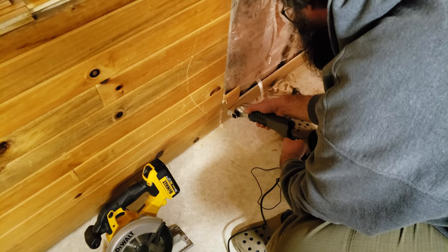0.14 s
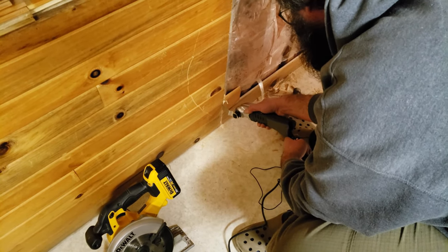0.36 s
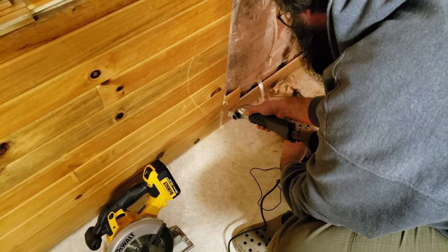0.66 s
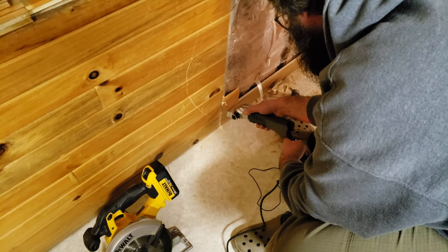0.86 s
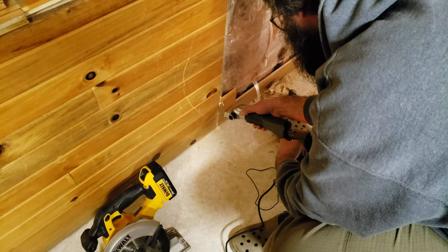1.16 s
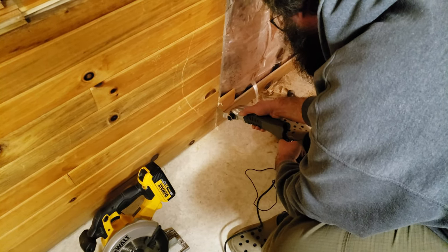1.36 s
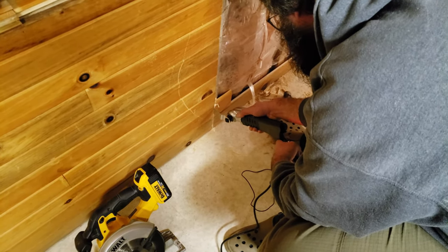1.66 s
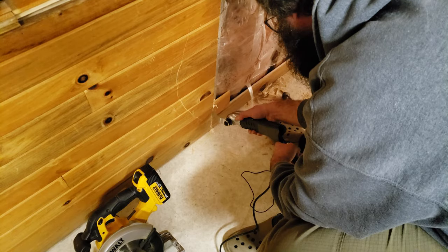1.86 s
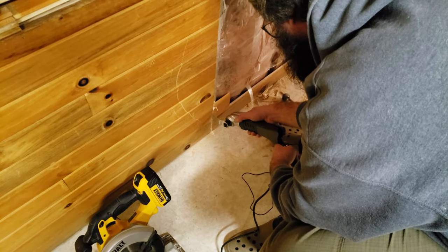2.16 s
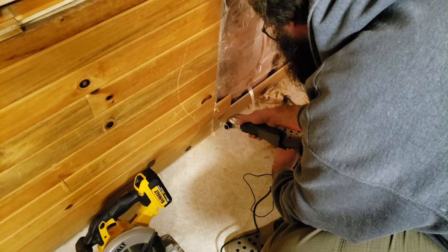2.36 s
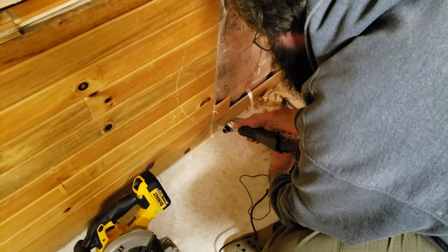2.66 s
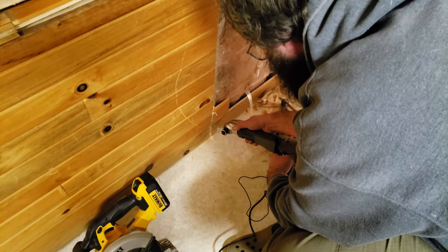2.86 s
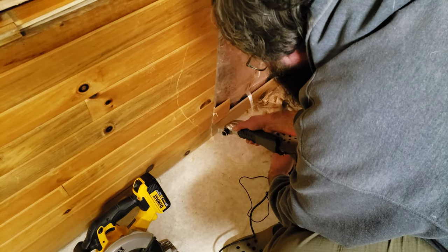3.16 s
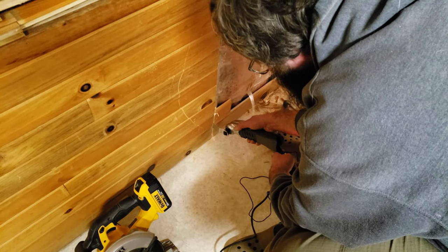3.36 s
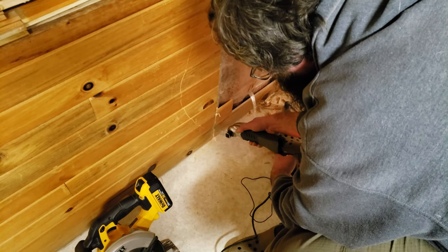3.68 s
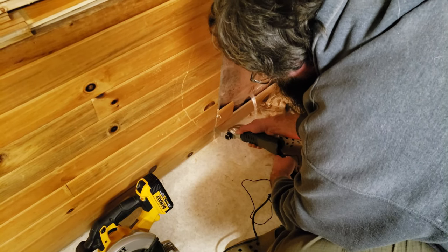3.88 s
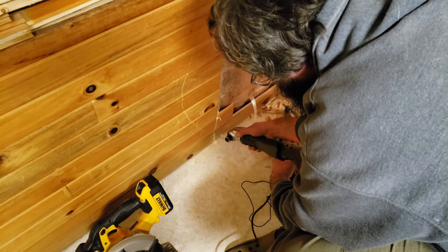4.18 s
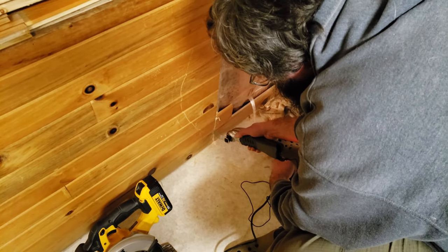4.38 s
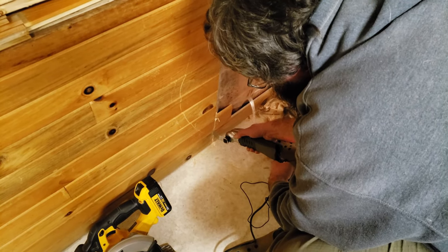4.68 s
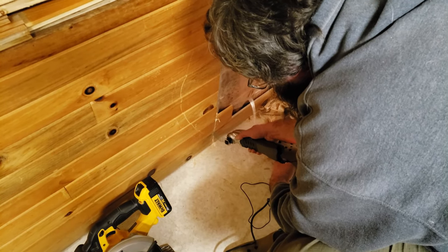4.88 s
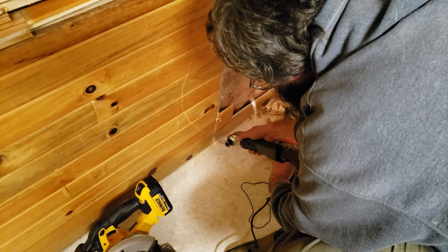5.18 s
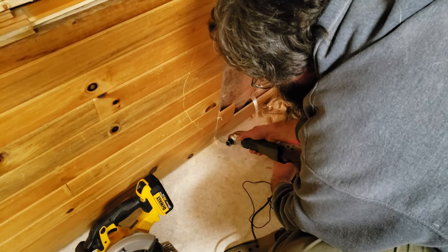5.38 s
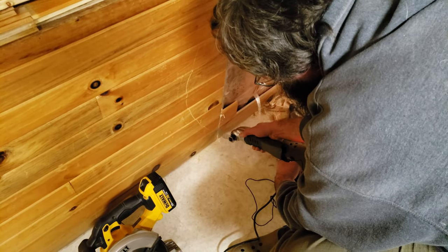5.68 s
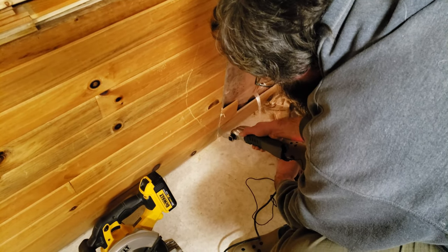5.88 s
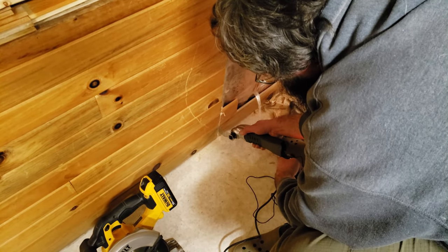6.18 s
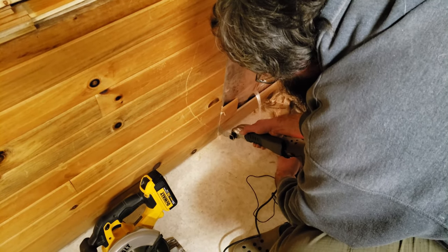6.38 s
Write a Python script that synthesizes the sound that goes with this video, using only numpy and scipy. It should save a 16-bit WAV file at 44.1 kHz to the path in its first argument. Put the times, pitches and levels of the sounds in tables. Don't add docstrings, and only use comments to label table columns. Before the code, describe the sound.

An oscillating power saw coasts to a knocking stop, restarts, then drones, buzzes and rasps through a hollow wooden wall, sagging under pressure, close indoors.

```python
import sys
import numpy as np
from scipy import signal
from scipy.fft import rfft, irfft, next_fast_len
from scipy.io import wavfile
from scipy.ndimage import uniform_filter1d, map_coordinates

SR = 44100
rng = np.random.default_rng(int(sys.argv[2]) if len(sys.argv) > 2 else 0)


def store_pcm(level_fs):
    pcm = np.round(np.clip(level_fs, -1, 1) * 32767).astype(np.int16)
    wavfile.write(sys.argv[1], SR, np.atleast_2d(pcm).T)


def boost(x):
    u = np.asarray(x, float) / 20
    return 10 ** u


N = 288414
T = np.arange(N) / SR
HZ = np.fft.rfftfreq(next_fast_len(N), 1 / SR)
TOP_HZ = 287.2

# (frequency [Hz], level [dB])
TEETH = [(8500, -17.5), (10000, -6.5), (11500, 0), (13000, 9), (14500, 7.5), (15900, 5.5), (17000, -29)]
# (frequency [Hz], left minus right [dB])
LEAN = [(60, 2), (150, -1), (380, -2), (950, 11), (2380, 10), (5980, 26.5), (15000, 23)]
# (pulled [s], released [s], coasting time [s])
TRIGGER = [
    (-.13, -.13, .37),
    (.419, 1.545, .55),
    (2.437, 7, .55),
]


def evened(x):
    return x / np.sqrt(np.mean(x ** 2) + 1e-20)


def read(points, hz):
    f, value = np.transpose(points)
    return np.interp(np.log(hz + 1), np.log(f + 1), value)


def during(spans, size):
    inside = sum((T > a) & (T < b) for a, b in spans)
    return uniform_filter1d(inside * 1., size=size)


def bumps(s, before, after, heights, size=32):
    d = T[::size, None] - s
    bells = np.exp(-(d / np.where(d < 0, before, after)) ** 2)
    return np.repeat(heights @ bells.T, size, axis=1)[:, :N]


def heard(pair, colour):
    # (frequency [Hz], likeness [0-1])
    likeness = [(60, 0.96), (250, 0.9), (500, 0.27), (1000, 0.3), (2500, 0.41), (6000, 0.13), (15000, .1)]
    a, b = rfft(pair, next_fast_len(N)) * boost(read(colour, HZ))
    same = np.clip(read(likeness, HZ), 0, 1)
    lean = boost(read(LEAN, HZ) / 2)
    left = a * lean
    right = (same * a + np.sqrt(1 - same ** 2) * b) / lean
    return irfft([left, right], next_fast_len(N))[:, :N]


def held(pair, window_s=0.041):
    power = uniform_filter1d(pair.mean(0) ** 2, int(window_s * SR))
    return pair / np.sqrt(abs(power) + 1e-12)


def room(pair, t60=0.3, wet_db=-3):
    t = np.arange(SR // 2) / SR
    tail = rng.standard_normal((2, len(t))) * boost(-60 * t / t60) * (t > .003)
    tail = tail / np.linalg.norm(tail[0])
    return pair + boost(wet_db) * signal.fftconvolve(pair, tail, axes=1)[:, :N]


def motor():
    spin_up_s, drag_hz = .063, 150
    hz = np.zeros(N)
    for on, off, coast_s in TRIGGER:
        up = TOP_HZ * (1 - np.exp(-np.maximum(T - on, 0) / spin_up_s))
        down = (TOP_HZ + drag_hz) * np.exp(-np.maximum(T - off, 0) / coast_s) - drag_hz
        hz = np.maximum(hz, np.where(T < off, up, down))
    return np.maximum(hz, 20)


def pushes():
    # (deepest [s], press time [s], ease time [s], speed sag [Hz], drone gain [dB])
    leans = [(.68, 0.042, 0.41, 7.06, 8), (.874, 0.12, 0.12, 26.4, 1.5), (1.129, 0.064, 0.084, 12.1, 4.5),
             (1.412, 0.14, 0.11, 22.3, 1), (2.75, 0.063, 0.14, 18.3, 5), (3.019, 0.31, 0.035, 47, 13.5),
             (3.064, 0.032, 0.12, 62, 11.5), (3.265, 0.17, 0.15, 39, 17), (3.589, .339, 0.048, 11.16, -1.5),
             (4.054, 0.17, 0.13, 44.3, 21), (4.681, 0.11, 0.12, 20, 3.5), (5.354, 0.26, 0.066, 22.8, 11.5),
             (5.493, 0.11, 0.074, 57.5, 9), (5.593, .033, 0.14, 16.2, 0.5), (5.881, 0.11, 0.024, 33.4, 9),
             (5.959, 0.066, .18, 110.5, 7.5), (6.54, 0.097, 0.11, 7, 5.5)]
    s, press, ease, sag_hz, drone_db = np.transpose(leans)
    return bumps(s, press, ease, np.array([sag_hz, drone_db]))


def bites():
    # (from [s], to [s], buzz gain [dB], rasp gain [dB], roughness [0-1])
    cuts = [(0.619, 0.936, 9.5, 16, 0.36), (0.906, 1.028, 10.5, 2, 0.1), (1.032, 1.207, 8.5, 8.5, 0.24),
            (1.199, 1.441, 7.5, 15, 0.31), (1.442, 1.489, 6.5, 3, 0.1), (2.566, 2.675, 3.5, 5, 0.63),
            (2.688, 2.956, 5.5, 12.5, 0.4), (2.948, 3.24, 7.5, 10.5, .32), (3.214, 3.486, 7, 7, 0.3),
            (3.495, 3.579, 1, 15, 0.15), (3.63, 3.79, 1, 6.5, 0.42), (3.798, 3.908, 5.5, 10.5, 0.33),
            (3.909, 4.116, 10, 17.5, 0.41), (4.1, 4.252, 3, 16.5, 0.18), (4.305, 4.552, -2, 15.5, 0.11),
            (4.536, 4.85, 2, 16.5, 0.03), (4.857, 4.971, 1, 11, 0.23), (5.095, 5.134, 8.5, 7, 0.84),
            (5.151, 5.298, 5, 0, 0.42), (5.29, 5.498, 6.5, 2, 0.4), (5.517, 5.773, 2.5, 1.5, 0.28),
            (5.751, 5.879, 6.5, 8.5, 0.31), (5.896, 6.189, 5.5, 5, 0.21), (6.237, 6.448, 5, 8, 0.19)]
    idle_rough = 0.34
    inside = np.array([during([row[:2]], size=1300) for row in cuts]).T
    inside = inside / np.maximum(inside.sum(1, keepdims=True), 1)
    buzz_db, rasp_db, rough = (inside @ np.array(cuts)[:, 2:]).T
    return buzz_db, rasp_db, rough + idle_rough * (1 - inside.sum(1))


def shudders():
    # (time [s], half length [s], thud [dB], chatter [0-1], added roughness [0-1])
    jerks = [(0.009, 0.029, -43, 0.1, 0.3), (0.114, 0.043, -38, 0.4, 0.3), (0.469, 0.047, -50, 0.4, 0),
             (0.638, 0.029, -44, 0, 0.2), (0.873, 0.03, -42, 0.4, 0), (1.1, 0.038, -49.5, 0.33, 0),
             (1.323, 0.074, -40, 0.87, 0.06), (1.84, 0.13, -49.5, 0, 0), (2.483, .018, -44.5, 0.25, 0),
             (2.7, 0.053, -43.5, 0.6, 0.1), (2.825, 0.061, -50, 0.4, 0.05), (2.958, 0.054, -46, 0.2, 0.04),
             (3.13, 0.061, -43, .25, 0.06), (3.77, 0.062, -76, 0, 0.08), (3.922, .03, -42, 0.66, 0),
             (4.049, 0.079, -45, 0.07, 0.02), (4.565, 0.015, -78, 0, .55), (4.674, 0.033, -63, 0.16, 0.3),
             (5.19, 0.051, -74, 0.2, 0.08), (5.331, .05, -48, 0.7, 0.08), (5.483, 0.1, -54.5, 1, 0.1),
             (6.02, 0.079, -45, .1, 0), (6.482, 0.032, -74, .05, .4)]
    s, half, thud_db, chatter, rougher = np.transpose(jerks)
    return bumps(s, half, half, np.array([boost(thud_db), chatter, rougher]))


def flutter(slow_s=.03):
    wobble = rng.standard_normal((N // 100 + 2, 7))
    for _ in range(2):
        wobble = uniform_filter1d(wobble, int(slow_s * SR / 100), axis=0)
    wobble = evened(wobble[:, :6] + 0.57 * wobble[:, 6:])
    return np.repeat(wobble, 100, axis=0)[:N].T


def controls():
    idle_db = [-44.5, -76.5, -48, -46.5, -44, -38.5]
    buzz_share = [0, 0.47, 0.37, 0.92, 0.45, 0.036]
    rasp_share = [0, 0, 0, 0, 0.59, 0.85]
    flutter_db = [2.4, 3, 2.27, 1.92, 1.48, 1.17]
    speed_law_db, powered_db = 29, 3
    stall_hz, stall_db = 55.6, -6
    wall_cutoff_hz, wall_slope_db = 140, 20
    free = motor()
    sag, drone_db = pushes()
    sag = sag * free / TOP_HZ
    buzz_db, rasp_db, rough = bites()
    thud, chatter, rougher = shudders()
    buzz_db = buzz_db + 8 * rougher
    rough = rough + rougher
    run_db = speed_law_db * np.log10(free / TOP_HZ)
    run_db = run_db + stall_db * np.clip((stall_hz - free) / 35, 0, 1)
    run_db = run_db + powered_db * during(np.array(TRIGGER)[:, :2], size=2000)
    db = np.c_[idle_db] + np.c_[buzz_share] * buzz_db + np.c_[rasp_share] * rasp_db + run_db
    db[0] += drone_db - powered_db - 0.34 * run_db
    db[0] += wall_slope_db * np.log10(np.minimum(free / wall_cutoff_hz, 1))
    db[1] = 20 * np.log10(boost(db[1]) + thud)
    db[2] += 0.0173 * (TOP_HZ - free + sag) + 0.25 * (drone_db - 7)
    db[2] = 20 * np.log10(boost(db[2]) + boost(db[1] - 9.5))
    db = db + np.c_[flutter_db] * flutter()
    return free - sag, db, np.clip(rough, 0, 1), np.clip(chatter, 0, 1)


def repeating(turns, chatter, drift_s=0.12, quicker=47.0, uneven=0.55, hop=441, size=2048, count=128):
    overtones = [-2.4, 3, -1.53, -1.7, -2.15]
    frames = N // hop + 2
    life_s = drift_s / (1 + np.arange(count) / quicker)
    slow = np.exp(-(np.arange(-60, 61)[:, None] * hop / SR / life_s) ** 2)
    slow = slow / np.linalg.norm(slow, axis=0)
    z = signal.fftconvolve(rng.standard_normal((2, 2, frames, count)), slow[None, None], "same", axes=2)
    z = z[0] + 1j * z[1]
    z = z / (abs(z) + 1.0) ** (1 - uneven)
    z[..., 1::2] *= (chatter ** 1.26)[np.minimum(np.arange(frames) * hop, N - 1), None]
    z[..., [0, 2]] = 0
    z[..., 4:14:2] *= boost(np.array(overtones))
    shapes = irfft(z, size)
    place = [np.arange(N) / hop, turns / 2 % 1 * (size - 1)]
    return held(np.array([map_coordinates(s, place, order=1) for s in shapes]))


def scraping(turns, chatter, scatter_db=1.5, depth=0.34, alternate=0.4):
    bite = boost(scatter_db * rng.standard_normal(8000))[(2 * turns).astype(int)]
    bite = uniform_filter1d(bite, size=20)
    swell = 1 + depth * np.cos(4 * np.pi * turns + np.pi)
    swell = swell + alternate * chatter * np.cos(np.pi * turns)
    return evened(bite * swell * rng.standard_normal((2, N)))


def drone(turns, level_db):
    wave = np.sin(2 * np.pi * turns + [[.25], [-.25]])
    return np.sqrt(2) * boost(level_db) * wave * boost([[.7], [-.7]])


def singing(clean, width=0.062):
    # (from [s], to [s], note [Hz], level [dB])
    boards = [
        (5.31, 5.5, 1270, -35.5),
        (5.31, 5.53, 480, -34),
        (2.68, 2.78, 1720, -41),
        (3.99, 4.11, 3150, -37),
        (0, .13, 260, -45),
        (.65, .78, 1640, -37),
        (4.33, 4.54, 2590, -40),
        (4.33, 4.54, 1435, -42),
    ]
    out = np.zeros((2, N))
    for start, end, hz, db in boards:
        note = [(hz * (1 - 3 * width), -40), (hz * (1 - width), -3),
                (hz * (1 + width), -3), (hz * (1 + 3 * width), -40)]
        out += boost(db) * held(heard(clean, note)) * during([(start, end)], size=1500)
    return out


def rumble(housing_db):
    # (frequency [Hz], level [dB])
    shake_colour = [(20, -11), (40, -20), (70, 2), (105, 8.5), (140, -36)]
    shake = held(heard(rng.standard_normal((2, N)), shake_colour), window_s=.3)
    return boost(-72 + 0.18 * (housing_db + 45)) * shake


def saw():
    # (frequency [Hz], level [dB])
    cavity = [(70, -18.5), (110, -12.5), (160, 11.5), (200, -3), (260, -43.5)]
    # (frequency [Hz], level [dB])
    panel = [(160, -26.5), (215, 0), (270, 8.5), (380, -0.5), (480, 1.5), (800, -4.5), (1250, -4.5),
             (1600, -68.5)]
    # (frequency [Hz], level [dB])
    housing = [(1000, -80), (1300, -0.5), (1900, 3), (2600, -0.5), (3700, -10), (4500, -24)]
    # (frequency [Hz], level [dB])
    blade = [(3000, -10.5), (3700, -3.5), (4600, -3.5), (5600, 1.5), (8400, -7.5), (10500, -8),
             (12500, -14)]
    roughness = [
        (.2, .6, 0),
        (0, .4, .45),
        (0, .85, .95),
        (.14, 1.35, 1.4),
        (.58, 1.1, 1.1),
    ]
    # (from [s], to [s])
    rests = [
        (.27, 0.41),
        (2.12, 2.425),
    ]
    free_hz = 288
    hz, (drone_db, *levels), rough, chatter = controls()
    unsteady = rng.standard_normal(N)
    for _ in range(2):
        unsteady = uniform_filter1d(unsteady, size=900)
    turns = np.cumsum(hz * (1 + 0.0205 * unsteady)) / SR
    clean = room(repeating(turns, chatter))
    scraped = scraping(turns, chatter)
    parts = []
    for colour, db, (own, factor, extra) in zip((cavity, panel, housing, blade, TEETH), levels, roughness):
        share = np.clip(own + factor * rough + extra * (1 - hz / free_hz), 0, 1)
        mixed = np.sqrt(1 - share ** 2) * clean + share * scraped
        parts.append(boost(db) * held(heard(mixed, colour)))
    out = drone(turns, drone_db) + singing(clean) + sum(parts) + rumble(levels[2])
    moving = 1 - during(rests, size=1500)
    wall = (parts[0] + parts[1]) * moving
    ringing = room(wall, t60=0.39, wet_db=-14) - wall
    return out * moving + ringing


def room_hush():
    # (frequency [Hz], level [dB])
    hush_colour = [(18, -36.5), (30, -7), (180, 2.5), (226, -22.5), (362, -5.5), (423, -12), (900, -26),
                   (1170, -59), (1980, -120)]
    return boost(-76) * held(heard(rng.standard_normal((2, N)), hush_colour), window_s=.4)


def knocks(ring_t60=0.092, tick_t60=0.02, creep_db=-15, creep_t60=0.15):
    # (time [s], low ring [dB], ring pitch [Hz], tick of the teeth [dB])
    blows = [
        (0.165, -25.5, 159, -47),
        (0.426, -32, 167, -56),
        (2.361, -61, 163, -53),
        (2.4, -51, 172.4, -43),
        (2.427, -57, 241.5, -42),
        (2.44, -57, 158, -38),
    ]
    ring, tick = np.zeros(N), np.zeros(N)
    t = np.arange(6000) / SR
    for s, db, hz, tick_db in blows:
        start = round(s * SR)
        ring[start:][:len(t)] += boost(db - 60 * t / ring_t60) * np.sin(2 * np.pi * hz * t) * np.minimum(t / 0.0023, 1)
        fade = boost(-60 * t / tick_t60) + boost(creep_db - 60 * t / creep_t60)
        tick[start:][:len(t)] += boost(tick_db) * fade * np.minimum(t / .002, 1)
    tick_colour = [(1000, 0.0), (6000, -6)] + TEETH[1:]
    bright = held(heard(rng.standard_normal((2, N)), tick_colour))
    return room(np.array([ring, ring]), t60=0.3, wet_db=-5) + tick * bright


def controller():
    # (frequency [Hz], level [dB rms])
    whine = [(2401, -68), (4807, -63.5), (7208, -78.5), (9615, -85), (12016, -76.5), (14422, -82)]
    # (on [s], off [s])
    whine_on = [
        (0.236, .44),
        (2.02, 2.52),
    ]
    settle, settle_s = .015, 0.013
    out = np.zeros((2, N))
    late = sum(settle * settle_s * np.exp(-np.maximum(T - on, 0) / settle_s) for on, _ in whine_on)
    for hz, db in whine:
        lean = boost(read(LEAN, hz) * np.array([[.5], [-.5]]))
        out += np.sqrt(2) * boost(db) * np.sin(2 * np.pi * hz * (T - late)) * lean / lean.mean()
    return out * during(whine_on, size=700)


def scene():
    return saw() + room_hush() + knocks() + controller()


def thinned(x, under_db=-13, top_hz=5500):
    hz, _, z = signal.stft(x, SR, nperseg=2048)
    power = uniform_filter1d(abs(z) ** 2, size=3, axis=1)
    nearby = uniform_filter1d(abs(z) ** 2, size=16, axis=1)
    masked = nearby * boost(2 * under_db) * (hz < top_hz)[:, None]
    return signal.istft(z * power / (power + masked + 1e-30), SR, nperseg=2048)[1][:, :N]


def roll_off(x):
    return signal.sosfilt(signal.butter(12, 16860, fs=SR, output="sos"), x)


def record(dry):
    soft = 1.1 * np.tanh(dry / 1.1)
    edge = signal.firwin(801, 15850, window=("kaiser", 9), fs=SR)
    mix = signal.oaconvolve(thinned(soft), edge[None], "same", axes=1)
    return roll_off(mix)


dry = scene()
out = record(dry)
store_pcm(out)
```